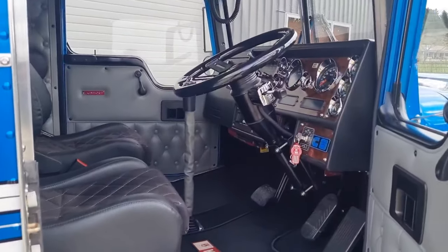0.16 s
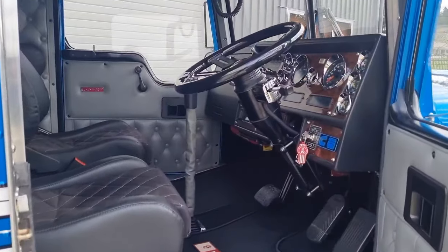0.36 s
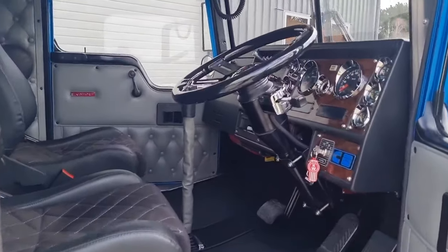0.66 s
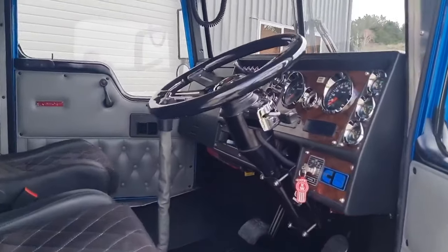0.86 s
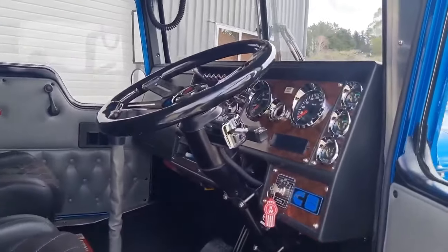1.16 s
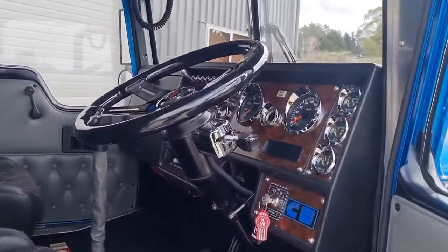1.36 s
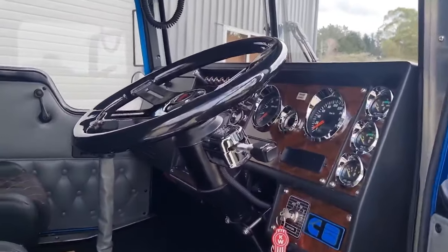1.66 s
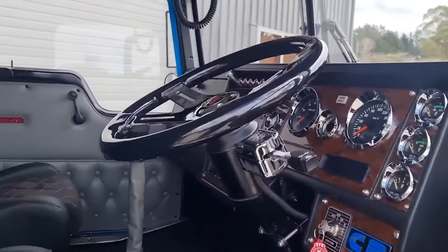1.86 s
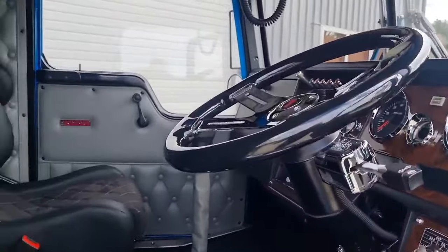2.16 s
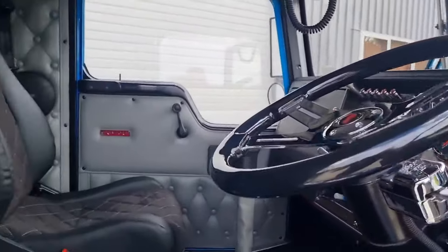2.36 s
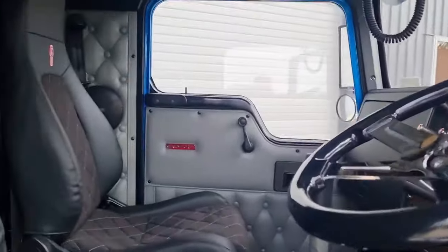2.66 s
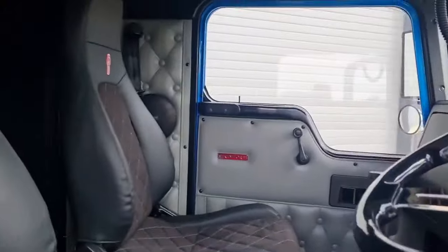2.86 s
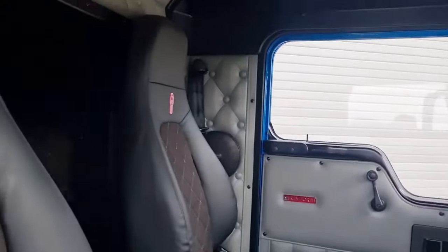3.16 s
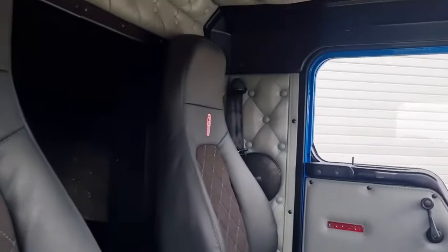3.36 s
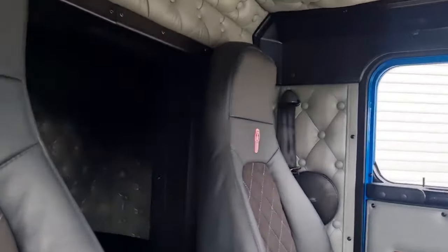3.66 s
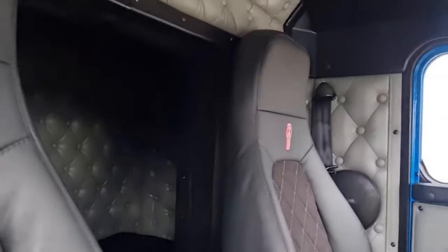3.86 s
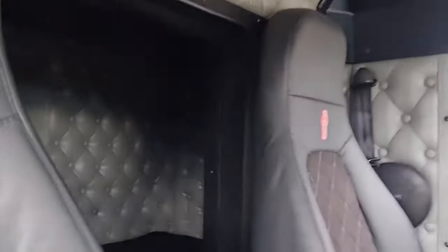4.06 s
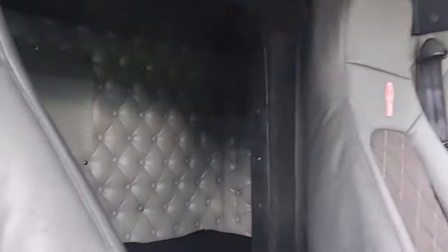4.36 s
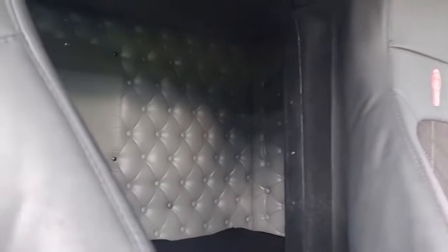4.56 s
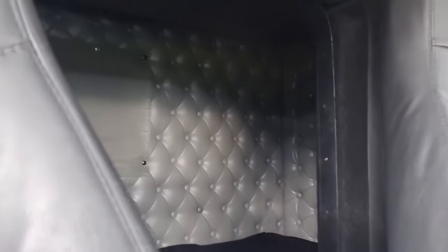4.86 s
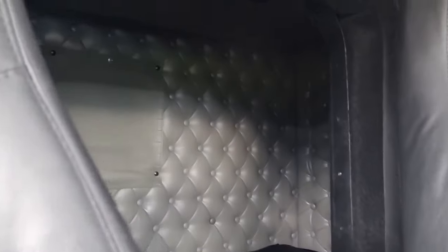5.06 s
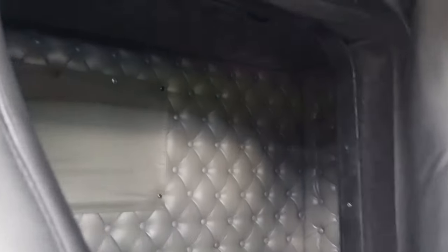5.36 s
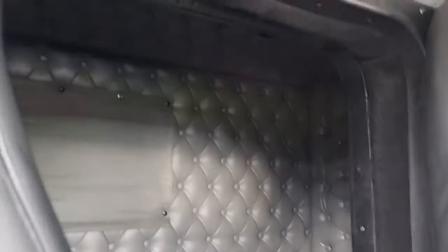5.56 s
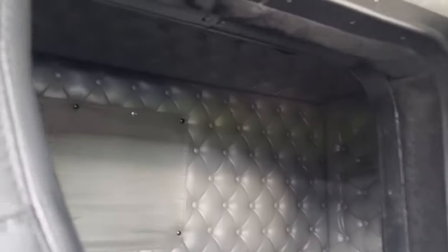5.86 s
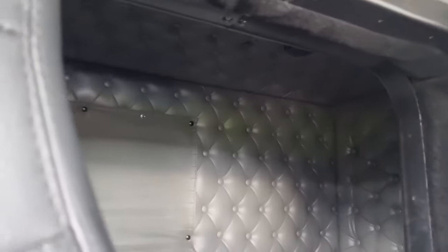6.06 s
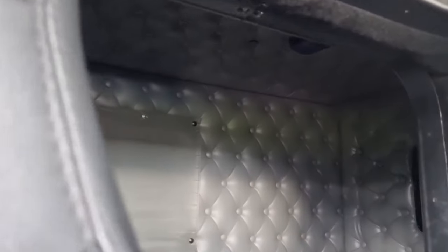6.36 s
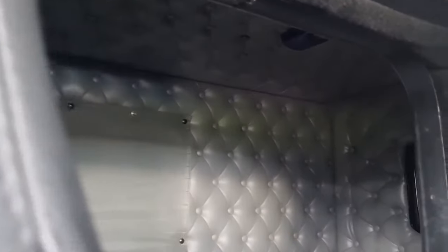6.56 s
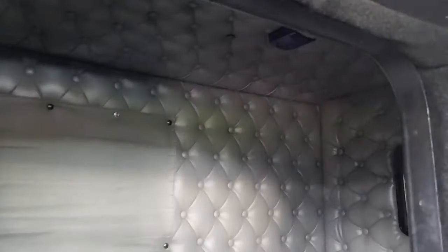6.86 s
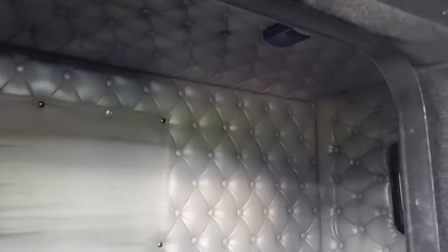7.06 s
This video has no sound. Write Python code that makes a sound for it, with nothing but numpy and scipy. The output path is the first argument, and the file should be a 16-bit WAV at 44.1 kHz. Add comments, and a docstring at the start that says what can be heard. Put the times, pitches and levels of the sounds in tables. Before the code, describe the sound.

Low, lumpy wind buffets the microphone while a bird gives two buzzy falling calls. The rumble drops away as the cab shelters it, leaving small trim knocks, a brief scrape and one hard, close click. Birds keep whistling and peeping outside. Later come a cluster of woody taps with a short metallic chatter, then firmer knocks near the end.

```python
"""Cab of a parked truck

Someone leans into the cab, engine off, while birds call in the yard outside. Trim taps, scrapes, a click
and a ringing metal part are damped modes and decaying noise set off by unit clicks; sleeves are noise strokes.
Birds are gliding sines, some trilled or buzzing, with echoes from the yard. Wind rumbles on the microphone
until the cab shelters it; wind, yard, leaves and hiss are shaped noise, the drone is narrow-band noise.
"""
import sys
import numpy as np
from scipy import signal
from scipy.io import wavfile

SR = 44100
rng = np.random.default_rng(int(sys.argv[2]) if len(sys.argv) > 2 else 0)


def digitize_waveform(pressure):
    """Quantize a signal to 16-bit integers and store it at the path in sys.argv[1].

    Rows of a 2-D input are taken as channels; values are limited to [-1, 1].
    """
    field = np.atleast_2d(pressure).T
    bounded = np.clip(field, -1, 1)
    quanta = np.round(bounded * 32767).astype(np.int16)
    wavfile.write(sys.argv[1], SR, quanta)


N = 317287
TIME = np.arange(N) / SR

# Air dying down as the cab shelters the microphone.
# Each row: time in seconds, wind rumble in dB, distant yard noise in dB, wind left-right balance in dB.
AIR_LEVELS = [(0, -40.5, -58, 12.5), (1.39, -37, -61, 1), (1.56, -58.5, -58, 3.5), (2.5, -58, -58, 4.5),
              (3.2, -69.5, -62.5, 4), (4.4, -68.5, -65.5, -1), (7.19, -66.5, -66.5, 5)]
# Soft background levels. Each row: time in seconds, hiss in dB, far rustle of leaves in dB.
SOFT_LEVELS = [(0, -94, -82), (0.75, -94, -93), (1.1, -90, -83.5), (2.8, -91, -82.5), (3.9, -88, -86.5),
               (5.0, -91, -86), (5.4, -85, -85.5), (6.25, -88, -88), (7.19, -86.5, -83.5)]
# Left-right likeness of the outdoor noise. Each row: frequency in Hz, likeness (limited to -1..1 in use).
OUTDOOR_LIKENESS = [(60, 2.5), (130, 1.2), (290, 0.27), (640, -0.44), (1400, -0.51), (3100, 0.23),
                    (15000, -2.5)]


def from_db(db):
    """Decibels to gain."""
    return 10 ** (np.asarray(db) / 20)


def rms_one(x):
    """Scale to unit rms."""
    return x / np.sqrt(np.mean(x ** 2) + 1e-20)


def in_time(rows):
    """Interpolate each column of a curve table at every sample."""
    s, *columns = np.transpose(rows)
    return [np.interp(TIME, s, column) for column in columns]


def at_hz(points, hz):
    """Read a spectrum on a log-frequency axis."""
    point_hz, value = np.array(points).T
    return np.interp(np.log(hz), np.log(point_hz), value)


def panned(x, pan_db):
    """Left-right level difference; positive is left."""
    return x * from_db(np.reshape([pan_db, -pan_db], (2, -1)) / 2)


def lagged(x, lag_s):
    """Arrival-time difference: the right channel is later, or earlier if negative."""
    left, right = np.broadcast_to(x, (2, N))
    return np.array([left, np.interp(TIME - lag_s, TIME, right)])


def add(out, s, sound):
    """Mix a sound in from a given time, at the earliest 0."""
    i = max(0, round(s * SR))
    out[..., i:i + sound.shape[-1]] += sound[..., :N - i]


def drift(corner_hz):
    """Slow random signal of rms about 1: noise through two equal poles."""
    step = 40  # samples between computed points
    r = np.exp(-2 * np.pi * corner_hz * step / SR)
    settle = 2000
    white = rng.standard_normal(N // step + settle + 2)
    slow = signal.lfilter([1], [1, -2 * r, r * r], white)[settle:]
    return np.interp(np.arange(N) / step, np.arange(len(slow)), rms_one(slow))


def noise(spectrum, patchy_db=0, likeness=((20, 0), (20000, 0))):
    """Stereo noise in half-octave bands, each with its own level, flicker and likeness; rms 1."""
    low, high = spectrum[0][0], min(spectrum[-1][0], SR * .45)
    edges = np.geomspace(low, high, round(2 * np.log2(high / low)) + 1)
    out, white = 0, rng.standard_normal((2, 2, N))
    for k, band in enumerate(zip(edges, edges[1:])):
        band_filter = signal.butter(2, band, "band", fs=SR, output="sos")
        mid, side = signal.sosfilt(band_filter, white[k % 2])  # neighbouring bands use different noise
        hz = np.sqrt(band[0] * band[1])
        alike = np.clip(at_hz(likeness, hz), -1, 1)
        flicker_db = patchy_db * drift(18) if patchy_db else 0
        stereo = np.sqrt(1 + alike) * mid + np.sqrt(1 - alike) * side * [[1], [-1]]
        out = out + from_db(at_hz(spectrum, hz) + flicker_db) * stereo
    return rms_one(out)


def ring(force, hz, t60_s):
    """One damped mode; a unit click starts a decaying sine of initial amplitude near 1."""
    r, w = from_db(-60 / (t60_s * SR)), 2 * np.pi * hz / SR
    return signal.lfilter([0, np.sin(w)], [1, -2 * r * np.cos(w), r * r], force + 1e-18)


def struck(force, modes):
    """A body answers a force with all its modes, in alternating polarity."""
    return sum((-1) ** k * from_db(db) * ring(force, hz, t60_s) for k, (hz, db, t60_s) in enumerate(modes))


def narrow(hz, width_hz):
    """A wavering tone: noise through one resonance, rms 1."""
    return rms_one(ring(rng.standard_normal((2, N)), hz, np.log(1000) / (np.pi * width_hz)))


def dying(force, t60_s):
    """Exponentially decaying envelope after each click."""
    return signal.lfilter([1], [1, -from_db(-60 / (t60_s * SR))], np.abs(force) + 1e-18)


def strokes(rows):
    """An envelope of half-sine swells."""
    out = np.zeros(N)
    for s, length_s, db in rows:
        add(out, s, from_db(db) * np.sin(np.linspace(0, np.pi, int(length_s * SR))))
    return out


def contacts(times_s, levels_db, slip_s, slip_db, touch_s=0.00365, touch_db=-17, count=4, size=N):
    """Each blow is a light first touch, one firm contact and a few weaker slips just after it."""
    out = np.zeros(size)
    for s, db, chance in zip(times_s, levels_db, rng.random((len(times_s), 2, count))):
        add(out, s - touch_s * (1 + chance[0, 0]) / 2, from_db([db + touch_db]))
        add(out, s, from_db([db]))
        for late, strength in zip(*chance):
            add(out, s + slip_s * late, from_db([db + slip_db]) * (2 * strength - 1) * (1 - late / 2))
    return out


def rattle(per_s, modes, pitch=1, size=N):
    """Uneven little contacts, each striking every mode with a strength of its own; rms 1."""
    hits = rng.random(size) < per_s / SR
    out = 0
    for hz, db, t60_s in modes:
        force = hits * rng.standard_normal(size)
        out = out + from_db(db) * ring(force, hz * pitch, t60_s)
    return rms_one(out)


def scattered(x, t60_s, wet_db, count=40):
    """Direct sound plus a shower of reflections, different at each side; the power is kept."""
    delays_s = rng.uniform(.0005, t60_s * .7, (2, count))
    echoes = np.zeros((2, int(t60_s * SR) + 1))
    for side, delay_s in zip(echoes, delays_s):
        side[(delay_s * SR).astype(int)] = rng.choice([-1, 1], count) * from_db(-60 * delay_s / t60_s)
    echoes *= from_db(wet_db) / np.linalg.norm(echoes, axis=1, keepdims=True)
    echoes[:, 0] = 1  # direct sound
    return signal.fftconvolve(np.atleast_2d(x), echoes, axes=1)[:, :N] / np.hypot(1, from_db(wet_db))


def panel_knock(stiffness_db, pitch, rattle_db):
    """One woody knock: a contact and its softer rebound ring the damped modes, detuned at each spot."""
    # Low trim modes, then stiffer ones and last a bright 8 kHz microphone resonance.
    # Each row: frequency in Hz, level in dB, t60 in seconds.
    trim_modes = [(227, -14.5, 0.032), (334, 0, 0.035), (420, 2.5, 0.026), (560, 3.5, 0.021)]
    clack_modes = [(796, 4, 0.018), (1008, 3.5, 0.013), (1240, -7.5, 0.011), (1656, -13, 0.026),
                   (2080, -10.5, 0.015), (2450, -15, 0.016), (7970, -23, 0.018)]
    rebound_s, rebound_db = 0.00234, -3
    spot_db, spot_detune = 1.8, .025  # random spread of mode level and relative frequency
    blow = contacts([0], [0], slip_s=.016, slip_db=rattle_db, touch_db=-29, size=SR // 5)
    rebound = np.roll(blow, round(rebound_s / pitch * rng.uniform(0.846, 1.143) * SR))
    soft = signal.sosfilt(signal.butter(1, 1500, fs=SR, output="sos"), rebound)
    force = blow + from_db(rebound_db) * soft
    spot = []
    for modes, tilt_db in ((trim_modes, -stiffness_db / 2), (clack_modes, stiffness_db / 2)):
        for hz, db, t60_s in modes:
            spot_hz = hz * pitch * (1 + spot_detune * rng.normal())
            spot.append((spot_hz, db + tilt_db + spot_db * rng.normal(), t60_s))
    return struck(force, spot)


def ticks():
    """Loose fittings tick along with some taps, one damped mode each."""
    # Each row: start in seconds, frequency in Hz, level in dB, t60 in seconds.
    tick_rows = [(2.225, 3490, -66, 0.077), (2.881, 5800, -69.5, 0.066), (5.07, 3280, -50.5, .02),
                 (5.2409, 3910, -45, 0.0099), (5.995, 1900, -48, 0.012), (6.63, 2580, -62, 0.074)]
    out = np.zeros(N)
    for s, hz, db, t60_s in tick_rows:
        add(out, s, from_db(db) * ring(signal.unit_impulse(SR // 5), hz, t60_s))
    return out


def seat_bumps():
    """The padded seat is bumped softly and rings on low damped modes."""
    # Each row: start in seconds, level in dB.
    bump_rows = [(4.526, -66.5), (4.586, -61), (4.669, -65.5), (4.71, -54), (4.809, -59.5), (6.386, -66),
                 (6.827, -69), (6.922, -71)]
    # Each row: frequency in Hz, level in dB, t60 in seconds.
    seat_modes = [(162, 6.5, 0.047), (299.5, 1.5, 0.087), (356, 4.5, 0.089)]
    s, db = np.transpose(bump_rows)
    return struck(contacts(s, db, slip_s=0.0095, slip_db=-10.0), seat_modes)


def taps():
    """Trim panels thud, knock and crackle; stiff spots clack, slack ones knock. The left leads."""
    # Each row: start in seconds, level in dB, stiffness in dB (clack over low modes), snap in dB above
    # the level, pitch ratio, rattle in dB above the contact, thud in dB above the level.
    tap_rows = [(1.539, -54.5, -8, -23, 1.2, -12, -10), (1.843, -61.5, -8.5, -16, 1.12, -9, -5),
                (1.933, -63, -14.5, -26, 1.1, -14, -7), (1.986, -60, -4.5, -25, 1.01, -16, -8),
                (2.031, -59, -5, -22, 1.07, -4, -7), (2.224, -52.5, 0.5, -28, 0.98, -14, -4.5),
                (2.292, -65, -2, -18, 1.04, -15, -9), (2.879, -65.5, -5, -6, 1.36, -5, -5),
                (3.867, -56.5, 4.5, -20, 1, -1.5, -2), (4.709, -64, 0, 5, 0.92, -5, -9),
                (4.724, -56.5, 2, 0.5, 0.89, -11, -2.5), (5.066, -50.5, 1.5, -5, 0.89, -5, -0.5),
                (5.0699, -53, -3, 7.5, 1.1, -4.5, -6), (5.157, -51.5, -1, -8, 0.8, -7, -7),
                (5.2353, -51, -1, -5.5, 0.927, -2, -6.5), (5.24, -46.5, 0.5, -2, 0.96, -8, -6.5),
                (5.265, -54.5, -2.5, -2.5, .9, -11, -8), (5.475, -57.5, -3, 7.5, 0.94, -9, -4.5),
                (5.487, -55, -4, -2, 0.9, -0.5, -2), (5.994, -56, -11.5, -8, 0.92, -9, -4.5),
                (6.443, -50, -7.5, -11.5, 0.96, -6.5, -13), (6.631, -47.5, 4, -14, 1, -17, -8.5),
                (6.8057, -45.5, -3.5, -13.5, 0.983, -12.5, -9.5), (6.9012, -45.5, 1, -13.5, 1, -20, -9.5),
                (6.918, -60.5, -7, -8, 0.82, -8, -12), (7.005, -52.5, 9, -1.5, 1, -11, -1.5),
                (7.129, -60.5, 1, -20, 0.88, -11, -6), (7.135, -49, 0.5, -15, 1, -10.5, -9)]
    # Whole panel. Each row: frequency in Hz, level in dB, t60 in seconds.
    thud_modes = [(117, 6.5, 0.17), (172.6, 4.5, 0.076), (248, -2.5, 0.092)]
    # Each row: frequency in Hz, relative level in dB per Hz.
    snap_spectrum = [(900, -34), (1500, 7), (3200, 5), (4500, -4.5), (6000, -3), (8000, 10), (10000, -25),
                     (15500, -5)]
    s, db, _, snap_db, _, _, thud_db = np.transpose(tap_rows)
    knock = struck(contacts(s, db + thud_db, slip_s=0.0241, slip_db=-6.5), thud_modes)
    for start_s, level_db, stiffness_db, _, pitch, rattle_db, _ in tap_rows:
        add(knock, start_s, from_db(level_db) * panel_knock(stiffness_db, pitch, rattle_db))
    knock += ticks() + seat_bumps()
    slips = contacts(s, db + snap_db, slip_s=.022, slip_db=-7, count=8)
    crackle = dying(slips, t60_s=.011) * noise(snap_spectrum)
    return panned(lagged(knock, lag_s=0.00022) + crackle, pan_db=3.0)


def ping():
    """A small metal part is knocked, chatters irregularly and rings briefly on its lowest modes."""
    # Ringing modes, damped chatter modes, bright crack modes.
    # Each row: frequency in Hz, level in dB, t60 in seconds.
    metal_modes = [(750, 8, 0.12), (860, -5, .06), (1226, -4, 0.15)]
    chatter_modes = [(980, -2, 0.039), (1145, -5, .04), (1630, 1, 0.021), (1800, 1, 0.029),
                     (2320, 1, 0.018), (2750, -1, 0.012), (3120, 0, 0.0099), (3440, -15, 0.018),
                     (3920, -15, 0.026)]
    crack_modes = [(1820, -13, 0.012), (2670, 2, 0.011), (3070, -3.5, 0.012)]
    start_s, ring_db, hits_per_s = 5.158, -50, 900
    crack_db, crack_t60_s = -39.5, 0.03
    chatter_db, chatter_t60_s = -44.5, 0.11
    nudge = np.zeros(N)
    add(nudge, start_s, np.ones(1))
    crack = from_db(crack_db) * dying(nudge, crack_t60_s) * rattle(hits_per_s, crack_modes)
    chatter = from_db(chatter_db) * dying(nudge, chatter_t60_s) * rattle(hits_per_s, chatter_modes)
    ringing = struck(contacts([start_s], [ring_db], slip_s=.022, slip_db=-7), metal_modes)
    return lagged(crack + chatter + ringing, lag_s=0.00023)


def scrapes():
    """Something drags over the trim in tiny slips that ring its modes, shifted in pitch per stroke."""
    # Each row: start in seconds, length in seconds, level in dB, pitch ratio.
    scrape_rows = [(2.022, 0.0326, -57, 0.98), (2.057, 0.038, -60.5, 1.05)]
    # Each row: frequency in Hz, level in dB, t60 in seconds.
    scrape_modes = [(1290, -10, .006), (1750, -8, .006), (2330, 0.5, 0.016), (2860, 1.5, 0.01),
                    (3250, 0, 0.0086), (3930, -6, 0.007)]
    out = np.zeros(N)
    for s, length_s, db, pitch in scrape_rows:
        swell = np.sin(np.linspace(0, np.pi, int(length_s * SR)))
        grains = rattle(600, scrape_modes, pitch, size=len(swell))
        add(out, s, from_db(db) * swell * grains)
    return out


def click():
    """One hard snap close by: bright crack modes, a splash of noise, a duller body, a faint rough ring."""
    # First instant, then body. Each row: frequency in Hz, level in dB, t60 in seconds.
    first_modes = [(1200, -6, 0.008), (1750, -4.5, 0.005), (3060, 3, .005), (4200, 4.5, 0.0024),
                   (7500, -2, 0.0019), (12500, -5, 0.00079), (14800, -1, .0007)]
    body_modes = [(149, -4, 0.028), (483, -15, 0.0078)]
    # Each row: frequency in Hz, relative level in dB per Hz.
    splash_spectrum = [(400, 9), (1200, -1), (1700, 8), (2400, -7), (3100, 8), (4200, 0), (5500, -16),
                       (7800, 2), (10000, -30), (13000, -21), (16000, -16)]
    force = np.zeros(N)
    add(force, 2.6522, from_db([-36.5]))
    crack = panned(lagged(struck(force, first_modes), lag_s=0.000144), pan_db=9)
    splash = from_db(-4) * dying(force, t60_s=0.027) * noise(splash_spectrum)
    rough_ring = from_db(-17.5) * dying(force, t60_s=0.26) * narrow(3090, width_hz=240)
    return crack + splash + struck(force, body_modes) + rough_ring


def sleeves():
    """Sleeves brush the upholstery: cloth catches and slides in grainy strokes, some duller than others."""
    # Each row: start in seconds, length in seconds, level in dB, treble in dB above the level.
    brush_rows = [(0.848, 0.42, -78.5, -10), (1.677, 0.24, -72.5, -10), (2.019, 0.029, -61, -21),
                  (2.047, 0.063, -58.5, -12), (2.625, 0.13, -72, 11.5), (3.833, 0.21, -70.5, -4),
                  (4.696, 0.06, -65.5, -4), (5.222, 0.062, -70.5, 14.5), (5.459, 0.062, -62, -1),
                  (6.891, 0.051, -74, 11), (7.016, 0.034, -70, 8.5)]
    # Each row: frequency in Hz, relative level in dB per Hz.
    cloth_spectrum = [(400, 5.5), (1000, 2.5), (1600, 0.5), (2400, -1), (3200, -2.5), (4500, -10),
                      (5500, -7), (7500, -6), (10000, -27), (15500, -14)]
    treble_hz = 4300
    catches = from_db(4.5 * np.minimum(drift(350), 2.5))
    cloth = rms_one(catches * noise(cloth_spectrum))
    dull = signal.sosfilt(signal.butter(2, treble_hz, fs=SR, output="sos"), cloth)
    bright = signal.sosfilt(signal.butter(2, treble_hz, "high", fs=SR, output="sos"), cloth)
    body = strokes([(s, length_s, db) for s, length_s, db, _ in brush_rows])
    treble = strokes([(s, length_s, db + treble_db) for s, length_s, db, treble_db in brush_rows])
    return body * dull - treble * bright  # minus: the two filters are in antiphase at the crossover


def tone(hz):
    """A sine of rms 1 on a pitch track."""
    return np.sqrt(2) * np.sin(2 * np.pi * np.cumsum(hz) / SR)


def whistles(notes, waver, trill_depth=0, sweep_hz=0):
    """Notes that glide along a slight bow, swell and fade, and may be trilled in level and pitch."""
    trill_hz = 38
    bow = 0.011  # share of the pitch by which a note's ends are lowered
    out, unsteady = np.zeros((2, N)), 1 + waver * drift(83)
    for s, length_s, pitch_hz, glide_hz, db, pan_db in notes:
        t = np.arange(int(length_s * SR)) / SR
        u, cycle = t / length_s, 2 * np.pi * trill_hz * t
        path_hz = pitch_hz * (1 - bow * (2 * u - 1) ** 2) + glide_hz * (u - .5)
        hz = path_hz * np.interp(s + t, TIME, unsteady) + sweep_hz * np.sin(cycle)
        swell = np.sqrt(np.sin(np.pi * u)) * signal.windows.tukey(len(t), .2)
        swell = swell * (1 + trill_depth * np.cos(cycle))
        add(out, s, panned(from_db(db) * swell * tone(hz), pan_db))
    return out


def calls(shape, repeats, buzz_hz=0, pulse_depth=0, sweep_hz=0, rasp_hz=0):
    """A bird repeats one gliding call; quick pulses, each a tiny downward sweep, can make it buzz."""
    out, (share, pitch_hz, shape_db) = np.zeros(N), np.transpose(shape)
    unsteady, flutter_hz = 1 + 0.0071 * drift(73), rasp_hz * drift(380)
    for s, length_s, db, left_out in repeats:
        t = np.arange(int(length_s * SR)) / SR
        u, cycle = np.linspace(left_out, 1, len(t)), 2 * np.pi * buzz_hz * t
        hz = np.interp(u, share, pitch_hz) * np.interp(s + t, TIME, unsteady)
        hz = hz + np.interp(s + t, TIME, flutter_hz) + sweep_hz * np.sin(cycle)
        swell = from_db(db + np.interp(u, share, shape_db)) * signal.windows.tukey(len(t), .05)
        pulses = rms_one(1 - pulse_depth * np.cos(cycle))
        add(out, s, swell * pulses * tone(hz))
    return out


def buzzy_calls():
    """A buzzing, falling call, pulsed in level and pitch and blurred by close reflections."""
    # Each row: share of the call, pitch in Hz, level in dB.
    slur_shape = [(0, 5300, -6), (.04, 5300, -4), (.055, 5200, -24), (.072, 4880, 0), (.135, 4660, 2.5),
                  (.24, 4440, -2.5), (.42, 4200, -1), (.58, 4020, -3.5), (.7, 3950, -1), (.76, 3780, -6),
                  (.81, 3550, 3), (.87, 3150, 7), (.925, 2750, 1.5), (1, 2400, -8)]
    # Each row: start in seconds, length in seconds, level in dB, share left out at the start.
    slur_rows = [(0.09, 0.262, -68.3, .06), (0.502, 0.269, -66.5, 0), (1.655, .265, -80, .06)]
    buzz = calls(slur_shape, slur_rows, buzz_hz=66.8, pulse_depth=.62, sweep_hz=75, rasp_hz=110)
    return scattered(lagged(buzz, lag_s=-0.000086), t60_s=.035, wet_db=-4)


def arched_calls():
    """Another bird's arched whistle, slightly rough in pitch."""
    # Each row: share of the call, pitch in Hz, level in dB.
    arch_shape = [(0, 4700, -10), (.12, 4700, -5), (.28, 4830, -4), (.45, 4770, -2.5), (.66, 4490, 0),
                  (.85, 4260, -1.5), (1, 4130, -6)]
    # Each row: start in seconds, length in seconds, level in dB, share left out at the start.
    arch_rows = [(2.145, 0.32, -78, 0.011), (5.534, 0.21, -78, 0.21), (6.617, .285, -80.5, 0.012)]
    return panned(lagged(calls(arch_shape, arch_rows, rasp_hz=35), lag_s=-0.000062), pan_db=2.0)


def peeps():
    """A small bird repeats one thin two-part peep; the pitch starts high, settles and slowly sinks."""
    # Each row: start in seconds, level in dB, left-right balance in dB.
    peep_rows = [(2.87, -84, -11), (3.05, -81, -8.5), (3.24, -86, 9), (3.43, -85, 0), (4.0, -85, -8),
                 (4.2, -88, 5), (4.4, -86, 9), (4.6, -83, 8), (4.77, -89, 0), (4.99, -84, 9.5),
                 (5.4, -88, 5), (5.78, -79, 9), (5.99, -73.5, 6.5), (6.19, -69, -8.5)]
    settled_hz, sag_hz_per_s = 6690, 45.3
    excess_hz, settle_s = 783, 0.72
    peep_s, glide_hz = 0.053, 72
    lead_s, lead_db, lead_drop_hz = .036, -8, 59  # softer, lower grace note
    notes = []
    for s, db, pan_db in peep_rows:
        since_s = s - peep_rows[0][0]
        hz = settled_hz - sag_hz_per_s * since_s + excess_hz * np.exp(-since_s / settle_s)
        notes.append((s, lead_s, hz - lead_drop_hz, 0, db + lead_db, pan_db))
        notes.append((s + lead_s, peep_s, hz, glide_hz, db, pan_db))
    return whistles(notes, waver=.006)


def far_chirps():
    """Short, faint notes of distant birds at random times, pitches and sides."""
    per_s, low_hz, high_hz = 4, 1900, 4400
    mean_s, max_glide_hz, mid_db, spread_db = 0.1, 350, -97, 5.5
    notes = []
    for when, long, high, rise, loud, side in rng.random((int(per_s * N / SR), 6)):
        s = when * (N / SR - mean_s)
        pitch_hz = low_hz * (high_hz / low_hz) ** high
        glide_hz = max_glide_hz * (2 * rise - 1)
        db = mid_db + spread_db * (2 * loud - 1)
        notes.append((s, mean_s * (.5 + long), pitch_hz, glide_hz, db, 10 * (side - .5)))
    return whistles(notes, waver=0.018)


def birds():
    """Several birds around the truck, from various sides, with a light echo from the yard."""
    # Clear, then trilled notes. Each row: start in seconds, length in seconds, pitch in Hz,
    # glide over the note in Hz, level in dB, left-right balance in dB.
    clear_notes = [(.03, 0.041, 2710, 24, -78.5, 3), (.08, 0.073, 2190, -110, -82, 3),
                   (.183, 0.061, 2095, -130, -71, 0), (.885, .024, 5140, 252, -80, -1.5),
                   (1.73, 0.079, 1910, -19, -73, 2), (1.79, .05, 3810, 46, -74.5, 0),
                   (2.985, 0.13, 3843, 59, -67.5, -2.5), (3.09, 0.14, 3860, -39, -82.5, 7),
                   (3.5, 0.014, 4180, -150, -66.5, 6), (3.74, 0.047, 1860, 130, -84.5, 3),
                   (4.11, 0.095, 2780, -92, -86, 10), (4.175, 0.073, 2370, 180, -79.5, 8),
                   (4.255, 0.058, 2330, -130, -79, 7.5), (4.533, 0.035, 4000, -350, -86, 1),
                   (4.558, 0.035, 3420, -180, -75, -2), (4.79, 0.044, 3880, -300, -81.5, -2),
                   (4.835, 0.035, 3530, -130, -74, 4), (4.88, 0.035, 3520, -43, -69.5, 1),
                   (4.925, 0.041, 3450, 28, -74.5, 0), (5.098, 0.023, 3900, -230, -70, 1),
                   (6.5, 0.05, 2570, 60, -79, 8)]
    trilled_notes = [(1.27, 0.064, 3450, -250, -79, -3), (1.36, .15, 2960, -260, -80, -1),
                     (2.7, 0.18, 3060, 89, -88, 15), (3.53, 0.07, 3380, -940, -81, 5),
                     (3.61, 0.1, 3410, -80, -84.5, 6), (5.86, .04, 3300, -1100, -79, 4),
                     (6.02, .25, 3265, 445, -74.5, 6), (6.22, 0.16, 3530, 291, -75, 4)]
    trilled = lagged(whistles(trilled_notes, waver=.011, trill_depth=.45, sweep_hz=45), lag_s=.0001)
    clear = lagged(whistles(clear_notes, waver=0.009) + peeps(), lag_s=.00007)
    distant = clear + trilled + arched_calls() + far_chirps()
    echoing = scattered(distant, t60_s=.28, wet_db=-10, count=200)
    return echoing + scattered(buzzy_calls(), t60_s=.3, wet_db=-12, count=300)


def wind():
    """Lumpy low rumble on the microphone with a few harder buffets, at first from the left."""
    # Rumble, then buffets. Each row: frequency in Hz, relative level in dB per Hz.
    wind_spectrum = [(11, -33), (18, -8), (43, 2.5), (79, 3.5), (99, -6), (170, -33.5), (209, -33.5),
                     (400, -50.5), (520, -64.5), (880, -120)]
    buffet_spectrum = [(40, 4.5), (90, 12), (160, -1.5), (250, -24.5), (400, -39.5)]
    # Each row: start in seconds, length in seconds, level in dB.
    buffet_rows = [(.225, 0.08, -40.5), (.42, 0.091, -44), (.83, 0.047, -30), (1.12, 0.037, -36),
                   (1.33, 0.055, -48), (1.74, 0.08, -49), (2.04, .1, -47.5)]
    gust_db, gust_corner_hz = 2, 9.6
    level_db, _, pan_db = in_time(AIR_LEVELS)
    gusts = from_db(level_db + gust_db * drift(gust_corner_hz))
    rumble = gusts * noise(wind_spectrum, likeness=[(30, 0.1), (200, 0.25)])
    return panned(rumble + strokes(buffet_rows) * noise(buffet_spectrum), pan_db)


def yard_air():
    """Distant yard noise: low-heavy noise with slightly flickering bands."""
    # Each row: frequency in Hz, relative level in dB per Hz.
    yard_spectrum = [(25, -10.5), (60, -1.5), (135, -9.5), (200, -23.5), (280, -20), (400, -23),
                     (600, -22.5), (800, -20), (1100, -38.5), (1500, -43.5), (3000, -43.5)]
    _, level_db, _ = in_time(AIR_LEVELS)
    return from_db(level_db) * noise(yard_spectrum, patchy_db=1.0, likeness=OUTDOOR_LIKENESS)


def drone():
    """Far machine drone and a low hum that swells and fades: noise through narrow resonances."""
    # Each row: frequency in Hz, width in Hz, level in dB.
    drone_rows = [(135, 26, -75.5), (740.4, 17, -85)]
    # Each row: time in seconds, level in dB.
    hum_levels = [(0, -82), (2, -79.5), (2.5, -65.5), (3.2, -73), (3.7, -86.5), (7.19, -94.5)]
    hum_db, = in_time(hum_levels)
    hum = from_db(hum_db) * narrow(217, width_hz=10)
    return hum + sum(from_db(db) * narrow(hz, width_hz) for hz, width_hz, db in drone_rows)


def leaf_rustle():
    """Far rustle of leaves: mid-band noise with flickering bands."""
    # Each row: frequency in Hz, relative level in dB per Hz.
    leaf_spectrum = [(1000, 0.5), (1500, 2), (2000, 0), (3000, 1.5), (4100, -1), (4700, -15), (6500, -20.5)]
    _, level_db = in_time(SOFT_LEVELS)
    return from_db(level_db) * noise(leaf_spectrum, patchy_db=2.5, likeness=OUTDOOR_LIKENESS)


def soft_hiss():
    """Soft treble hiss: noise with flickering bands."""
    # Each row: frequency in Hz, relative level in dB per Hz.
    hiss_spectrum = [(4500, -12.5), (6000, -7.5), (7700, 4.5), (8800, -2.5), (10500, -13), (12500, -5),
                     (15800, -1.5)]
    level_db, _ = in_time(SOFT_LEVELS)
    return from_db(level_db) * noise(hiss_spectrum, patchy_db=2.0)


def scene():
    """Small contacts inside the cab, birds and air outside."""
    cab = scattered(taps() + ping() + scrapes(), t60_s=.09, wet_db=-5.5)
    air = wind() + yard_air() + drone() + leaf_rustle() + soft_hiss()
    return cab + click() + sleeves() + birds() + air


def record(dry):
    """Steep low-pass: the top is cut above 15.8 kHz."""
    return signal.sosfilt(signal.ellip(10, .1, 80, 15800, fs=SR, output="sos"), dry)


dry = scene()
out = record(dry)
digitize_waveform(out)
```